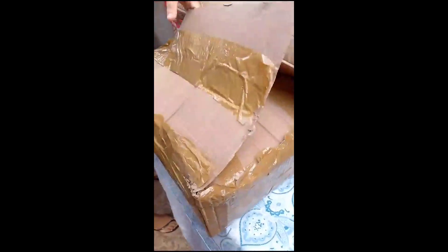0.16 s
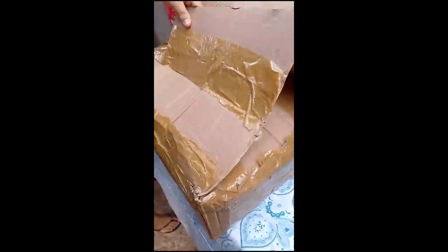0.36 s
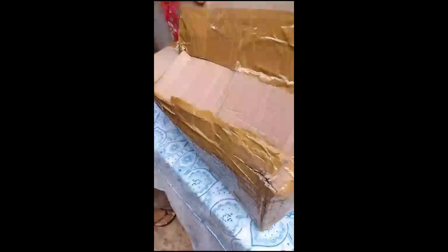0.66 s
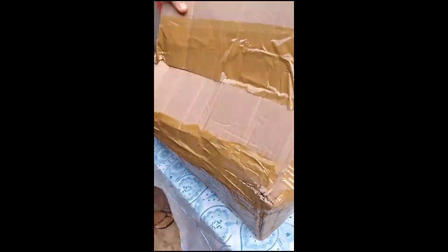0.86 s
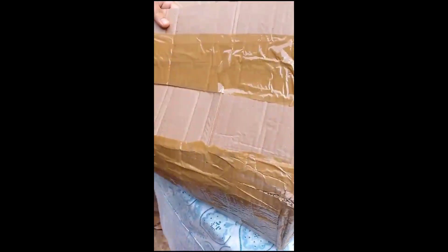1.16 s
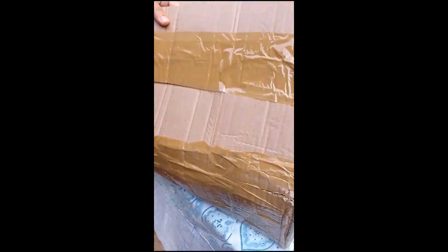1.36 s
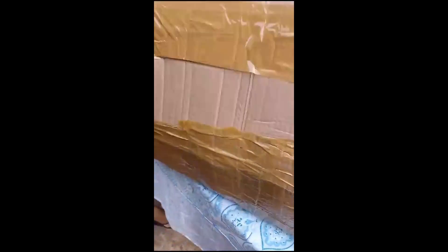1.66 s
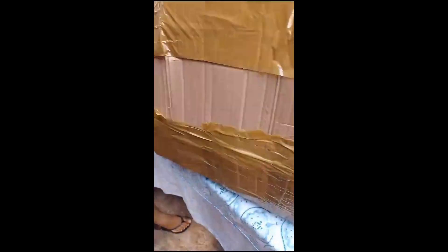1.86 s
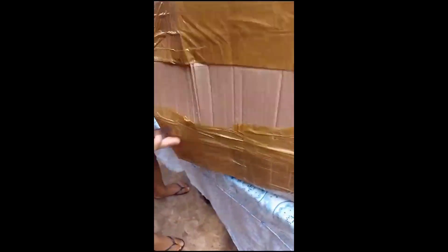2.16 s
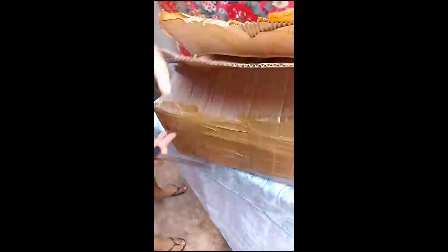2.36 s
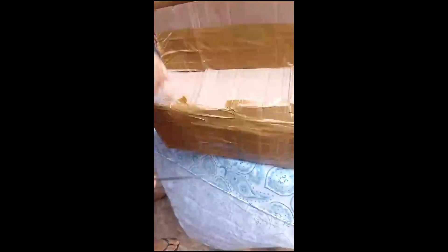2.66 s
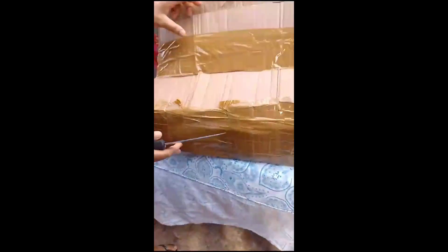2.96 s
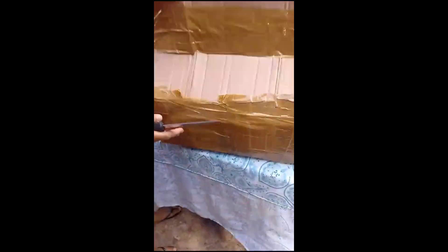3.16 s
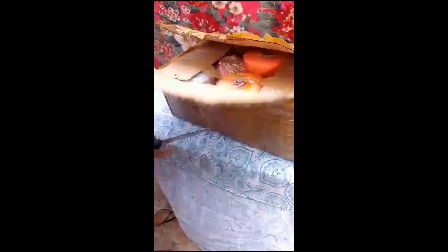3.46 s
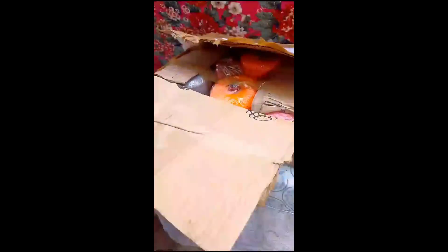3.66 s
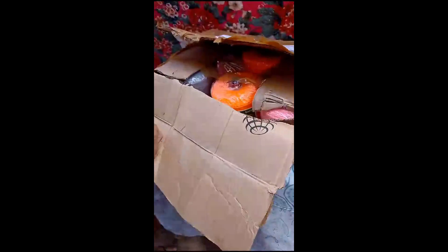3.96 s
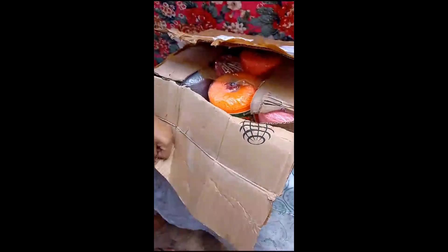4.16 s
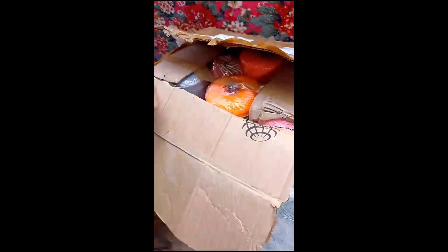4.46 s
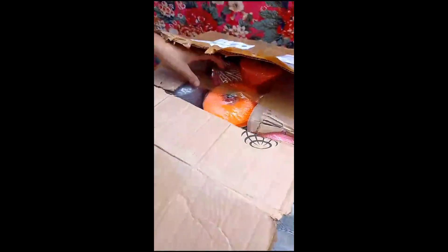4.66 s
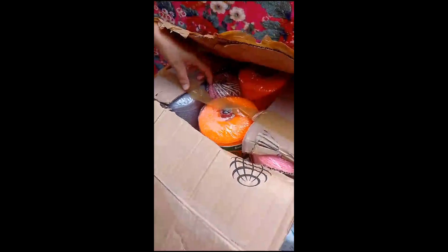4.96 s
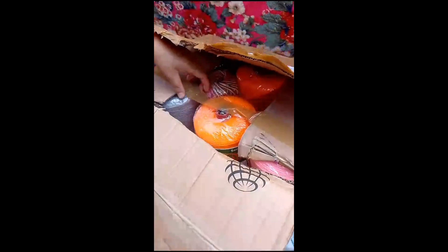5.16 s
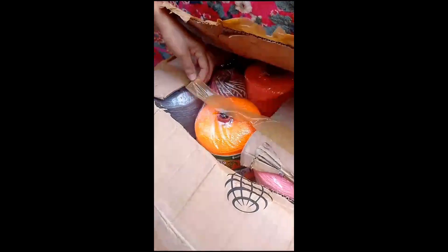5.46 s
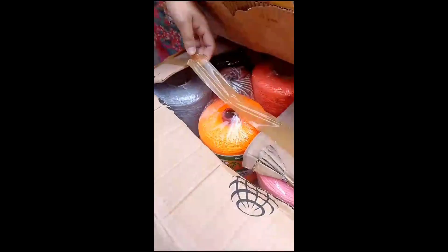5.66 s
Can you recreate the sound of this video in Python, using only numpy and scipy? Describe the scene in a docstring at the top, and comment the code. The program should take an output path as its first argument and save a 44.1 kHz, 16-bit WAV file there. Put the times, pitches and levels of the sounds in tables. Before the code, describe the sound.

Close, dry box thumps and papery rubs, crisp plastic crinkles and snaps, ending as packing tape tears off plastic wrap in quick bursts.

```python
"""Opening a taped parcel, close up

A taped cardboard parcel is turned and opened on a cloth-covered table, close to a phone in a small room.
Hands, scissors and flaps rub as filtered noise and stick-slip grains; creases tick as short noise bursts.
Knocks swing a flap and ring the box's modes, and shoves and blows make the table boom softly.
Buckling cardboard cracks in noise bursts; at the end packing tape rips off plastic wrap in a stutter of them."""
import sys
import numpy as np
from scipy import signal
from scipy.fft import rfft, irfft
from scipy.io import wavfile
from scipy.ndimage import map_coordinates

SR = 44100
rng = np.random.default_rng(int(sys.argv[2]) if len(sys.argv) > 2 else 0)


def file_out(sig):
    """Save sig as 16-bit WAV at sys.argv[1]."""
    # one column per channel
    cols = np.atleast_2d(sig).T
    # limit, then scale
    lim = np.clip(cols, -1, 1)
    pcm = np.round(lim * 32767).astype(np.int16)
    wavfile.write(sys.argv[1], SR, pcm)


N = 256216
TIME = np.arange(N) / SR

# spectrum of the still air in the room: (frequency [Hz], level [dB])
AIR_SPECTRUM = [(25, -11), (90, -13.5), (170, -14), (300, -16), (1000, -23), (3000, -28.5), (8000, -27.5),
                (16000, -37.5)]
# cardboard faces close by that mirror the sound: (extra delay [s], level [dB])
NEARBY_FACES = [(.00062, -21), (.00168, -8.5), (.0029, -7.5), (.0043, -20.5)]
# shoves of the box along the table: (start [s], length [s], level [dB])
SHOVES = [(1.002, 0.14, -58), (1.783, 0.075, -54.5), (3.112, 0.31, -55.5), (3.297, 0.91, -63)]
# modes that the cardboard box rings with: (frequency [Hz], width [Hz], level [dB])
BOX_MODES = [(135, 14, -1), (219.7, 118, -2), (280, 46, 5), (357, 46, 1.5), (543, 109, 3), (606, 135, 0.5),
             (803, 150, 4), (903, 200, 2), (1080, 184, -6), (1214, 130, -13)]
# blows on the box:
# (time [s], flap thump [dB], flap tone [Hz], wall clatter [dB], rustle after it [dB])
KNOCKS = [(0.2108, -19.5, 345, -46, -54), (0.231, -20, 327, -33, -44), (0.244, -18, 307, -30, -33),
          (.464, -37, 300, -54, -59), (0.508, -24.5, 218, -30.5, -35.5), (.737, -28.5, 282, -25, -50),
          (.745, -22, 470, -42, -53), (1.004, -41, 292, -59, -66), (1.023, -35, 292, -66, -54),
          (1.496, -32.5, 292, -27, -27), (1.574, -24, 330, -29.5, -29), (1.643, -39, 387, -33.5, -34.5),
          (1.788, -23, 275, -14.5, -28.5), (1.822, -21, 620, -30, -28.5), (1.852, -22, 271, -26, -27.5),
          (2.031, -35, 265, -36, -43), (2.068, -33, 588, -35.5, -45), (2.631, -29, 310, -33.5, -40),
          (2.686, -17.5, 310, -31, -38), (2.806, -35, 303, -39, -79), (2.957, -35, 288, -38, -51.5),
          (2.974, -34, 297, -42, -64), (3.059, -37.5, 272, -58, -61), (3.153, -30, 255, -62, -57),
          (3.176, -29, 263, -50, -39.5), (3.245, -44, 280, -36.5, -47.5), (3.907, -27.5, 249, -35.5, -41),
          (4.078, -23.5, 287, -25, -53), (4.447, -45, 445, -32.5, -39), (4.474, -51, 472, -35.5, -60),
          (4.565, -25, 344, -46, -46), (5.152, -42.5, 377, -39, -47), (5.272, -40, 397, -47, -50.5),
          (5.619, -48, 335, -22, -39), (5.661, -24, 360, -25.5, -33), (5.69, -21, 282, -49, -31),
          (5.792, -26, 462, -30.5, -36)]
# edges and fingers rasping over board or squeaking on film, and the rough mid-pitched body
# of two loud cracks: (start [s], length [s], level [dB], centre [Hz], width [Hz])
SCRAPES = [(0, 0.038, -35, 774, 254), (.113, 0.031, -35.5, 2200, 1800), (0.388, 0.042, -46, 2020, 900),
           (0.618, 0.066, -53, 714, 450), (1.03, 0.13, -52.5, 276, 89), (1.762, .03, -35.5, 680, 305),
           (1.787, .014, -21, 1690, 1520), (1.978, 0.021, -32, 6450, 700), (2.075, 0.024, -49, 1010, 600),
           (2.393, 0.08, -42.5, 530, 298), (3.335, 0.16, -57, 1080, 343), (3.498, 0.0796, -48.5, 700, 300),
           (4.019, 0.09, -42, 1120, 960), (4.075, 0.015, -38, 1500, 1160), (4.201, 0.0057, -37, 2380, 2600),
           (4.956, 0.078, -54.5, 378, 148), (4.436, 0.062, -50.5, 820, 680), (5.053, 0.25, -39, 7770, 2060),
           (5.097, 0.27, -55.5, 564, 440)]
# rubs of hands, scissors and flaps: (start [s], length [s], film hiss [dB], paper rasp [dB],
# board rumble [dB], lone crackles relative to the hiss [dB])
RUBS = [(0, 0.0067, -22.5, -28.5, -35, -7), (0.075, 0.18, -28.5, -36, -39, -23),
        (0.272, 0.097, -53, -46, -48.5, 6), (0.42, 0.1, -60, -45, -53.5, -3),
        (0.48, 0.14, -33, -41, -47.5, 2.5), (0.597, 0.12, -33, -32, -33, -11),
        (0.706, 0.091, -34.5, -35, -52, -8.5), (0.853, 0.098, -53.5, -49, -58.5, -6),
        (0.986, .09, -61, -51.5, -48.5, -5), (1.146, 0.15, -58.5, -61, -64, 6),
        (1.439, 0.1, -49, -51, -57.5, 0.5), (1.747, 0.083, -38, -36.5, -35.5, 0),
        (1.861, 0.14, -41, -42.5, -42, 1), (2.028, .06, -41, -48.5, -56, 2),
        (2.103, 0.055, -53, -60, -61, 6), (2.284, 0.048, -52.5, -58, -63.5, -1),
        (2.338, 0.077, -38.5, -50.5, -55.5, -24), (2.391, 0.16, -33.5, -41, -45.5, -1.5),
        (2.738, 0.018, -38, -68, -53, 5), (2.845, 0.073, -54.5, -72, -71, 15),
        (2.975, 0.069, -37, -46.5, -43.5, 5), (3.083, 0.093, -39, -55, -52.5, 6),
        (3.154, 0.039, -33, -53, -42, 1), (3.282, .06, -36.5, -53, -47, -1),
        (3.327, 0.12, -39.5, -52.5, -47.5, 2), (3.475, 0.1, -32.5, -49, -68, 2.5),
        (3.665, 0.0093, -32.5, -56, -61, 18), (3.77, .1, -42.5, -55.5, -52.5, -2),
        (3.931, 0.034, -39, -45, -68, 2), (3.982, 0.14, -39, -47.5, -47, -3.5),
        (4.195, 0.018, -41, -44.5, -67, 3), (4.253, 0.035, -53, -84, -69, 10),
        (4.393, 0.058, -49, -49, -54, -1), (4.433, 0.014, -35.5, -55, -53, 7),
        (4.514, 0.046, -38.5, -54, -47.5, -12), (4.567, 0.12, -48, -75, -66, -2),
        (4.73, 0.15, -43.5, -55, -72, -15), (4.89, 0.14, -39.5, -52.5, -62.5, -12),
        (5.029, 0.17, -33, -56, -45.5, -10), (5.195, 0.13, -41.5, -56, -52.5, -18),
        (5.357, 0.13, -48, -56.5, -59, 1), (5.51, 0.095, -38, -30.5, -39.5, -6),
        (5.616, 0.078, -37, -28.5, -35, 6)]
# spectrum of friction on plastic film: (frequency [Hz], level [dB])
FILM_SPECTRUM = [(150, -50), (2500, -22), (4300, -6), (5600, -4), (7000, 6.5), (9000, 5.5), (12000, 1),
                 (15000, 3), (16000, -50)]
# spectrum of the papery rasp: (frequency [Hz], level [dB])
PAPER_SPECTRUM = [(100, -55), (700, 5.5), (1400, -1), (2200, 2.5), (3200, 2), (4500, 3.5), (7000, -2.5)]
# creases of tape and wrap that snap out singly: (time [s], level [dB])
SINGLE_TICKS = [(.289, -29), (.3933, -25.5), (.5545, -18), (.5835, -10), (.701, -14.5), (.9011, -31),
                (1.0694, -36), (1.2506, -36), (1.2792, -32), (1.6917, -19), (1.7164, -30), (1.8957, -19),
                (2.121, -26), (2.479, -21), (2.4921, -11.5), (2.5362, -18), (2.5534, -16.5), (2.6168, -30),
                (2.695, -15.5), (3.0024, -19.5), (3.2463, -20.5), (3.3673, -43), (3.3825, -22.5),
                (3.6805, -22), (3.7452, -24.5), (3.8354, -18.5), (3.899, -14), (3.9026, -6.5),
                (4.2022, -14), (4.5555, -23), (5.4041, -18.5), (5.416, -8), (5.5092, -7), (5.5222, -10.5)]
# flurries of creases as tape is crumpled or cut: (start [s], length [s], level [dB])
FLURRIES = [(0.52, .05, -23), (0.603, .03, -21), (2.474, .095, -18), (2.573, .08, -19), (3.0, .2, -40),
            (3.287, .2, -40), (3.515, .075, -20.5), (3.618, .105, -25.5), (3.778, .055, -29.5),
            (4.208, .1, -42)]
# cracks of buckling cardboard and tears of tape:
# (start [s], length [s], level [dB], papery rasp relative to the bright part [dB])
CRACKS_AND_TEARS = [(0.72, 0.0042, -8.5, -30), (0.728, 0.022, -9, -6.5), (1.495, .004, -12, -15),
                    (1.574, 0.012, -25, 4.5), (1.651, 0.0043, -29.5, -0.5), (1.79, 0.005, -12, 3),
                    (1.851, 0.0064, -11, -2), (2.03, 0.0066, -27.5, -1.5), (2.439, 0.0043, -15, -26),
                    (4.079, 0.0031, -18, -4), (5.532, 0.021, -8, -10), (5.554, 0.01, -7, -4),
                    (5.565, 0.016, -15.5, -3.5), (5.6027, .005, -3, -1), (5.611, .003, -17, -5),
                    (5.62, .037, -9, -7), (5.661, 0.0044, -8, -4), (5.678, 0.0038, -3, -17),
                    (5.6873, 0.0095, -8.5, -9), (5.7025, 0.0024, -5, -11), (5.717, 0.005, -4.5, -13.5),
                    (5.733, 0.013, -18, -19), (5.7912, 0.0052, -2, -15)]
# spectrum of the bright part of cracks and tears: (frequency [Hz], level [dB])
BRIGHT_SPECTRUM = [(100, -60.5), (1500, -32), (3200, -14), (4500, -3.5), (5600, -6), (7300, 2), (9500, -1),
                   (12000, -10), (14000, -5.5), (16000, -10)]

AIR_DB = -64.5
# a rub swells over a share of its length, holds, and dies away
SWELL_SHARE, RELEASE_S = 0.39, 0.038
# a knock leaves the taped walls rustling; paper and board relative to the film
SETTLE_S, SETTLE_PAPER_DB, SETTLE_BOARD_DB = 0.042, -2.5, -2
CREASE_HZ, CREASE_SCATTER_OCT = 9300, 0.044
FLURRY_GAP_S = 0.024
# the bent tape keeps relaxing with faint stray ticks
STRAY_DB, STRAY_SCATTER_DB = -47, 7
# cracks and tears run in bursts a few milliseconds apart that weaken along the way
BURST_S, BURST_GAP_S, BURST_JITTER = 0.0012, 0.0046, 0.28
BURST_SCATTER_DB, SPENT_DB_PER_S = 3.5, 123.5


def undb(db):
    """Decibels to gain."""
    return 10 ** (np.asarray(db) / 20)


def unit(x):
    """Scale to rms 1."""
    return x / np.sqrt(np.mean(x ** 2) + 1e-18)


def lasting(x, seconds):
    """Scale a short sound to the energy of rms 1 held for so long."""
    return x * np.sqrt(seconds * SR / (np.sum(x ** 2) + 1e-18))


def add(track, s, sound):
    """Mix a sound into a track at time s."""
    i = int(np.clip(s * SR, 0, N - 1))
    track[i:i + len(sound)] += sound[:N - i]


def butter(x, hz, kind):
    """Second-order Butterworth filter."""
    return signal.sosfilt(signal.butter(2, hz, kind, fs=SR, output="sos"), x)


def colour(x, points, size=1024):
    """Causal filter of unit energy through (Hz, dB) points."""
    hz, db = np.transpose(points)
    grid = np.maximum(np.fft.rfftfreq(size, 1 / SR), 1)
    level_db = np.interp(np.log(grid), np.log(hz), db)
    # folding the cepstrum onto positive times gives minimum phase
    cepstrum = irfft(np.log(undb(level_db)))
    cepstrum[1:size // 2] *= 2
    cepstrum[size // 2 + 1:] = 0
    response = irfft(np.exp(rfft(cepstrum)))
    return signal.fftconvolve(x, response / np.linalg.norm(response))[:len(x)]


def resonate(x, hz, width):
    """One resonance, gain 1 at its centre."""
    b, a = signal.iirpeak(min(hz, SR / 2 - 1000), hz / min(width, SR / 4), fs=SR)
    return signal.lfilter(b, a, x)


def walk(rate):
    """A smooth random wander through rate points a second, spread 1."""
    knots = rng.standard_normal(8192)
    return unit(np.interp(TIME * rate, np.arange(len(knots)), knots))


def grains(rate, spread_db):
    """Tiny stick-slip releases at random moments, mostly small and a few large."""
    hit = rng.random(N) < rate / SR
    size = undb(spread_db * np.minimum(rng.exponential(size=N), 3.5))
    return unit(hit * size * rng.choice([-1, 1], N))


def stroke(s, length):
    """Power of one sliding movement: swell, hold, release."""
    t = TIME - s
    swell = np.clip(t / (SWELL_SHARE * length), 0, 1) ** 2
    return swell * np.exp(-2 * np.maximum(t - length, 0) / RELEASE_S)


def still_air():
    """Steady noise with the colour of the air in the room."""
    return unit(colour(rng.standard_normal(N), AIR_SPECTRUM)) * undb(AIR_DB)


def room(x, low_t60=0.39, high_t60=0.3, low_db=-11.0, high_db=-14.5, split_hz=2500, size=22050):
    """A small furnished room: a short diffuse tail behind the direct sound."""
    t = np.arange(size) / SR
    noise = rng.standard_normal(size) * (t > .005)
    low = butter(noise, split_hz, "low")
    response = 0
    for band, t60, db in ((low, low_t60, low_db), (noise - low, high_t60, high_db)):
        fade = np.exp(-np.log(1000) * t / t60)
        response = response + undb(db) * band * fade / np.linalg.norm(fade)
    return x + signal.fftconvolve(x, response)[:N]


def mirrored(x, drift=0.0823, rate=3.5):
    """Reflections off flaps a hand's breadth away comb the sound; the teeth slide as the box moves."""
    out = x
    for delay, db in NEARBY_FACES:
        lag = delay * SR * (1 + drift * walk(rate))
        out = out + undb(db) * map_coordinates(x, [np.arange(N) - lag], order=3)
    return unit(out)


def box(x, detune=1, low_hz=190, high_hz=1500):
    """The box's modes; small panels radiate little bass and the soft board eats the treble."""
    ring = 0
    for k, (hz, width, db) in enumerate(BOX_MODES):
        ring = ring + (-1) ** k * undb(db) * resonate(x, hz * detune, width)
    return butter(ring, [low_hz, high_hz], "band")


def table(blows, board, rumble_db=-31):
    """The table booms softly when the box on it is shoved, rubbed or knocked."""
    shove_power = sum(stroke(s, length) * undb(db) ** 2 for s, length, db in SHOVES)
    unsteady = undb(1.7 * np.tanh(walk(rate=60)))
    drag = (np.sqrt(shove_power) + undb(rumble_db) * board) * unsteady
    boom = resonate(resonate(grains(rate=160, spread_db=7.0), 100, 100), 72, 150)
    knocked = resonate(resonate(blows, 84, 70), 120, 90)
    return unit(boom) * drag + undb(-3) * knocked


def knocking(flap_s=0.0043, rise_s=0.0047, contact_s=0.0014, rattle_s=0.011, rattle_db=-16,
             push_db=20, clatter_low_hz=420, thump_low_hz=110, size=6000):
    """A blow swings a flap briefly while the first push and the rough contact clatter through the walls."""
    t, out = np.arange(size) / SR, np.zeros(N)
    contact = np.exp(-t / contact_s) + undb(rattle_db) * np.exp(-t / rattle_s)
    push = undb(push_db) * (t == 0)
    flap_shape = (1 - np.exp(-t / rise_s)) * np.exp(-t / flap_s)
    for s, thump_db, hz, clatter_db, _ in KNOCKS:
        swing = butter(np.sin(2 * np.pi * hz * t) * flap_shape, thump_low_hz, "high")
        rough = rng.standard_normal(size) * contact
        detune = np.exp(0.1 * rng.standard_normal())
        walls = butter(box(push + rough, detune), clatter_low_hz, "high")
        add(out, s, lasting(swing, flap_s) * undb(thump_db))
        add(out, s, lasting(walls, rattle_s) * undb(clatter_db))
    return out


def scraping(catch_s=0.0018):
    """Chattering grains ring a patch of board or film under an edge, or give two loud cracks their body."""
    out, chatter = np.zeros(N), grains(rate=2500, spread_db=0.5)
    for s, length, db, hz, width in SCRAPES:
        t = np.arange(int(length * SR)) / SR
        ramps = np.minimum(np.minimum(t, length - t) / catch_s, 1)
        rough = chatter[int(s * SR):][:len(t)] * ramps
        ringing = resonate(resonate(rough, hz, width), hz, 2 * width)
        add(out, s, unit(ringing) * undb(db))
    return out


def shifting(x, depth_db, rate, sharpness=0.035, count=40):
    """The flexing sheet changes shape, so its narrow resonances come and go."""
    out = x
    for hz in np.geomspace(900, 14500, count) * np.exp(.015 * rng.standard_normal(count)):
        gain = undb(depth_db * np.clip(walk(rate), -2, 1.5))
        out = out + (gain - 1) * resonate(x, hz, hz * sharpness)
    return unit(out)


def sliding(settle_crackle=0.39):
    """Strength of the friction on film, paper and board, and the share of it on film that crackles."""
    rows, jolts = np.array(RUBS), np.zeros(N)
    strokes = np.array([stroke(s, length) for s, length in rows[:, :2]])
    for s, *_, rustle_db in KNOCKS:
        add(jolts, s, undb([rustle_db]) ** 2)
    # each jolt decays exponentially in power
    settle = signal.lfilter([1], [1, -np.exp(-2 / (SETTLE_S * SR))], jolts + 1e-18)
    rub_power = undb(rows[:, 2:5].T) ** 2
    settle_power = undb([0, SETTLE_PAPER_DB, SETTLE_BOARD_DB]) ** 2
    power = rub_power @ strokes + np.outer(settle_power, settle)
    crackle_share = 1 / (1 + undb(-rows[:, -1]) ** 2)
    crackly = (rub_power[0] * crackle_share) @ strokes + settle_crackle * settle
    film, paper, board = np.sqrt(power)
    return film, paper, board, np.clip(crackly / power[0], 0, 1)


def rubbing(film, paper, board, crackle_share):
    """Skin and flaps slide: hiss and lone crackles on film, rasp on paper, a rumble in the walls."""
    grip_db = 2.0 * walk(rate=110)
    smooth = rng.standard_normal(N) + undb(-9.5) * grains(rate=3000, spread_db=8.0)
    slide = shifting(mirrored(smooth), depth_db=5.5, rate=9)
    crackle = mirrored(grains(rate=220, spread_db=5.0))
    friction = np.sqrt(1 - crackle_share) * slide + np.sqrt(crackle_share) * crackle
    rumble = unit(box(mirrored(grains(rate=1500, spread_db=3.5))))
    hiss = film * colour(friction, FILM_SPECTRUM)
    rasp = paper * colour(friction, PAPER_SPECTRUM)
    return (hiss + rasp + board * rumble) * undb(grip_db)


def creases(count=16, size=130):
    """Time and level of every snap: single ones, strays throughout, and those in each flurry."""
    moments = (np.arange(size) + rng.random(size)) * TIME[-1] / size
    levels = STRAY_DB + STRAY_SCATTER_DB * rng.uniform(-1.1, 1, size)
    snaps = list(SINGLE_TICKS) + list(zip(moments, levels))
    for start, length, db in FLURRIES:
        after = (np.arange(count) + rng.random(count)) * FLURRY_GAP_S
        snaps += [(start + s, db) for s in after if s < length]
    return snaps


def crinkling(decay_s=0.00056, tail_s=0.0092, tail_db=-17, width_hz=6500, body_db=-19, size=700):
    """Each crease snaps with a sub-millisecond decay, shivers the sheet and taps the board under it."""
    t, out, taps = np.arange(size) / SR, np.zeros(N), np.zeros(N)
    shape = np.exp(-t / decay_s) + undb(tail_db) * np.exp(-t / tail_s)
    for s, db in creases():
        burst = rng.standard_normal(size) * shape
        hz = CREASE_HZ * 2 ** (CREASE_SCATTER_OCT * rng.standard_normal())
        snap = resonate(resonate(burst, hz, width_hz), hz, 1.23 * width_hz)
        add(out, s, lasting(snap, decay_s) * undb(db))
        add(taps, s, lasting(burst, decay_s) * undb(db))
    return out + undb(body_db) * colour(taps, PAPER_SPECTRUM) + undb(-5) * box(taps)


def cracking_and_tearing(rise_s=0.00015, release_s=0.002, sag_s=0.0079, tail_s=0.0028, tail_db=-23,
                         size=2048):
    """Cardboard cracks or tape lets go in short noise bursts, singly or in a stutter."""
    t, out = np.arange(size) / SR, np.zeros(N)
    run = np.exp(-t / sag_s - np.maximum(t - BURST_S, 0) / release_s)
    shape = (1 - np.exp(-t / rise_s)) * (run + undb(tail_db) * np.exp(-t / tail_s))
    for start, length, db, rasp_db in CRACKS_AND_TEARS:
        s = 0
        while s < length:
            noise = rng.standard_normal(size) * shape
            bright = lasting(colour(noise, BRIGHT_SPECTRUM), BURST_S)
            rasp = lasting(colour(noise, PAPER_SPECTRUM), BURST_S)
            burst_db = db - SPENT_DB_PER_S * s + BURST_SCATTER_DB * rng.standard_normal()
            # a burst with less than a full gap left is weaker
            gain = np.sqrt(min((length - s) / BURST_GAP_S, 1)) * undb(burst_db)
            add(out, start + s, (bright + undb(rasp_db) * rasp) * gain)
            s += BURST_GAP_S * np.exp(BURST_JITTER * rng.standard_normal())
    return out


def scene():
    """All the handling in the room, over still air; both channels are alike."""
    blows = knocking()
    film, paper, board, crackle_share = sliding()
    handling = table(blows, board) + blows + scraping()
    handling = handling + rubbing(film, paper, board, crackle_share)
    handling = handling + crinkling() + cracking_and_tearing()
    return np.tile(room(handling) + still_air(), (2, 1))


def record(dry, low_cut_hz=50, hollow_hz=165, hollow_width_hz=30, peak=.78, top_hz=15800):
    """The bass is thin with a hollow in it; the phone rounds the sharpest peaks and cuts the top."""
    thin = butter(dry, low_cut_hz, "high")
    thin = thin - resonate(thin, hollow_hz, hollow_width_hz)
    rounded = thin / (1 + (thin / peak) ** 4) ** (1 / 4)
    top_cut = signal.ellip(8, .1, 50, top_hz, fs=SR, output="sos")
    return signal.sosfiltfilt(top_cut, rounded)


dry = scene()
out = record(dry)
file_out(out)
```